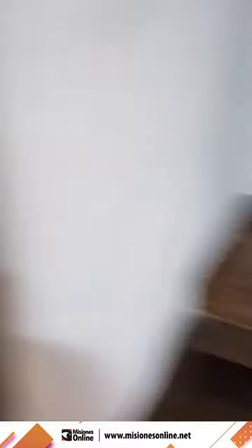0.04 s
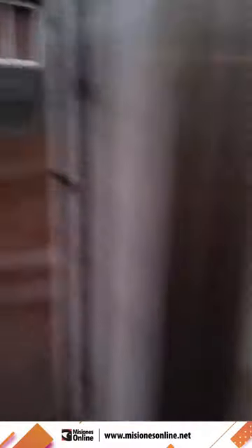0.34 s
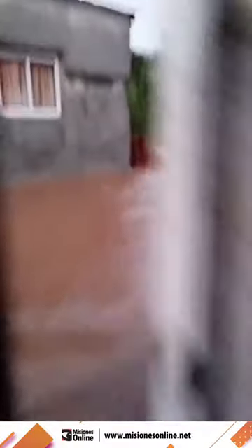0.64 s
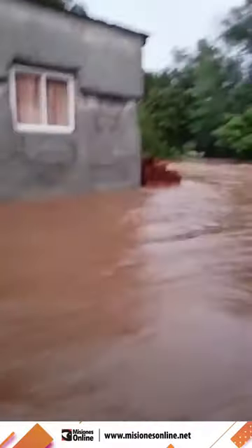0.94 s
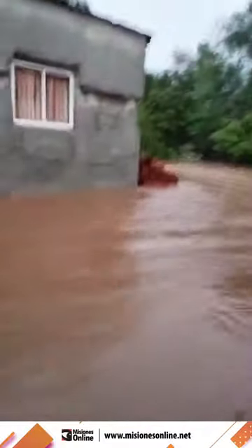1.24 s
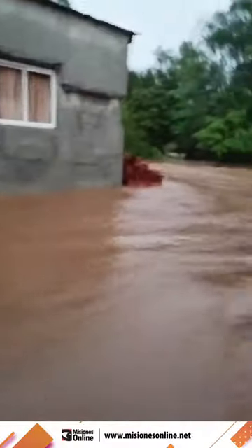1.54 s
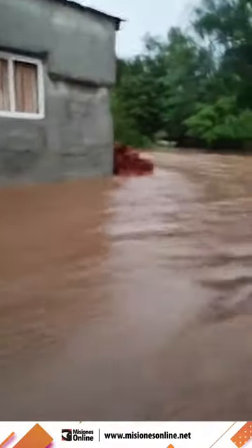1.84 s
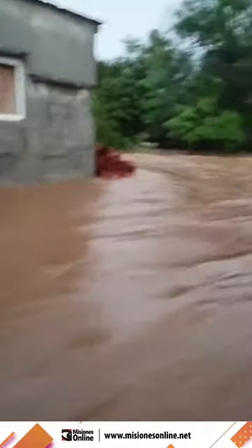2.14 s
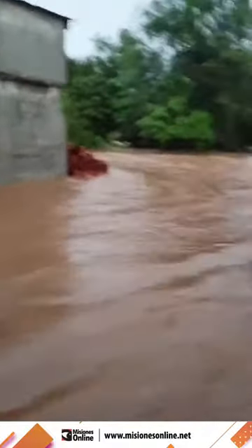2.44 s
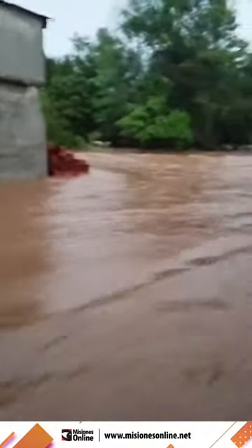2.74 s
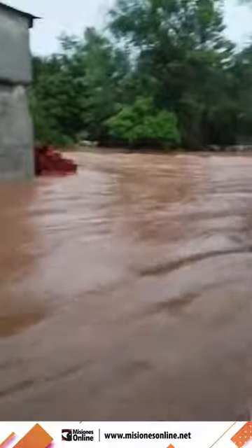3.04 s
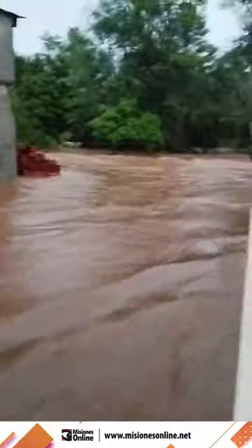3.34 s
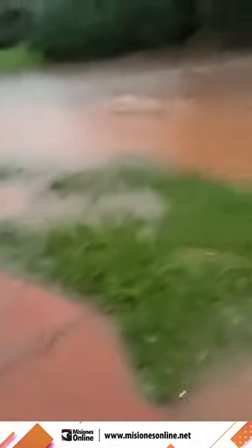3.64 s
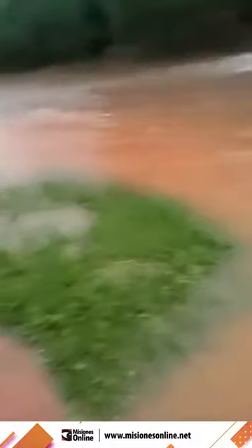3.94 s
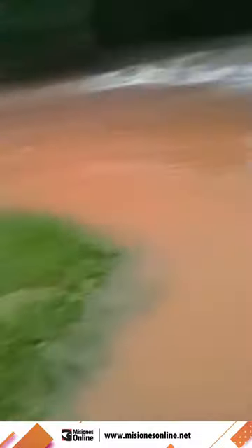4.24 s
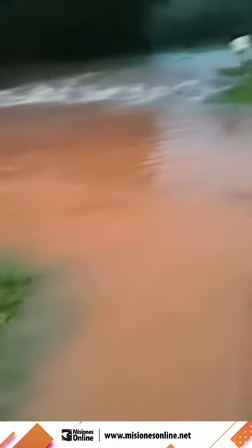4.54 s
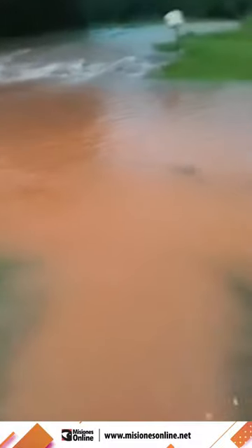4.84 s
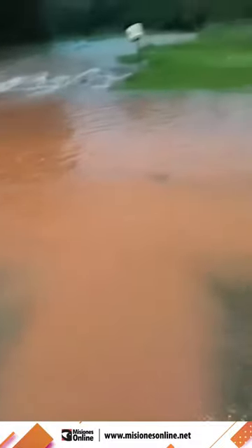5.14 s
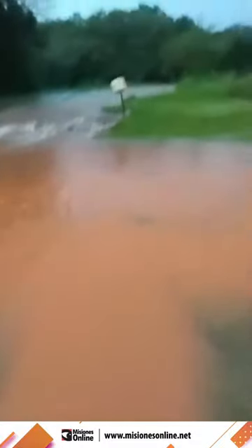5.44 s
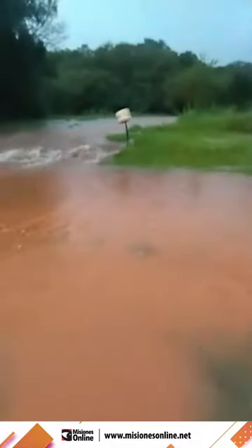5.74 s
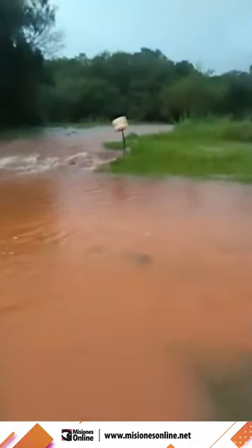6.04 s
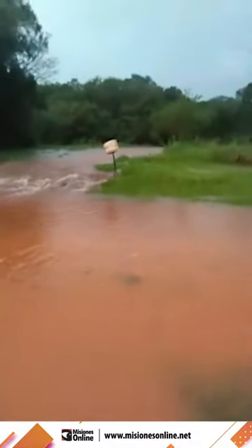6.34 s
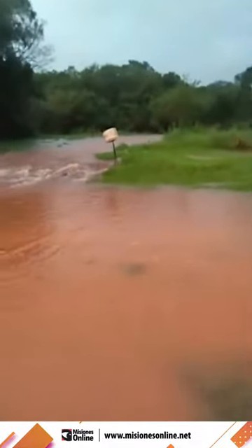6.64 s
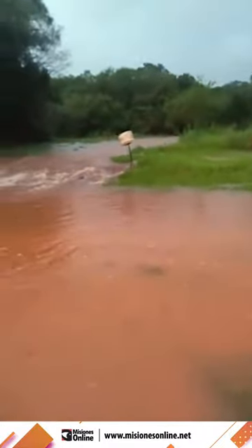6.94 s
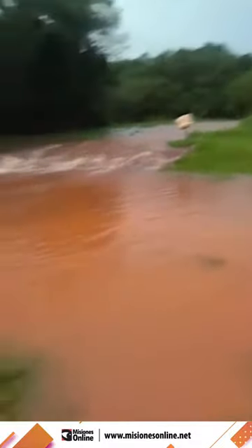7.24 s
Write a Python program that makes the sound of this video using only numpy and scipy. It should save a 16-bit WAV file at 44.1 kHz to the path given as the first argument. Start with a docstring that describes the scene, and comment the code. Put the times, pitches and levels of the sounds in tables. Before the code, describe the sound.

A heavy, steady roar of floodwater starts muffled and opens into a bright hiss, as heard on approaching a window. Light rustling, a soft thump, several sharp ticks and a low motor-like drone accompany it. After a sudden cut, a much softer stream runs over a flooded road, in mono: a brief swell of splashing, then irregular bubbling, low glugs, trickling and close drips.

```python
"""Floodwater roars past a house, brightening as the listener nears a window, with a low drone like a far
motor, soft rustles, a dull bump and sharp ticks. Eddies make the rumble; bursting bubbles make the hiss.
After 3.5 s the scene changes to a ford, in mono: shallow water surges, then babbles and gurgles across
a road while drops patter close by. The babble is five narrow bands that swell and fade; single bubbles
and large air pockets ring among them as damped oscillators."""
import sys
import numpy as np
from scipy import signal
from scipy.fft import rfft, irfft, next_fast_len
from scipy.io import wavfile
from scipy.ndimage import uniform_filter1d

SR = 44100
rng = np.random.default_rng(int(sys.argv[2]) if len(sys.argv) > 2 else 0)


def materialize(psi):
    """Save the field psi as 16-bit PCM at rate SR to the path in sys.argv[1].

    A 1-D psi becomes a single channel; in a 2-D psi each row is a channel.
    """
    bounded = np.clip(np.atleast_2d(psi).T, -1, 1)
    quanta = np.round(bounded * 32767).astype(np.int16)
    wavfile.write(sys.argv[1], SR, quanta)


N = 330309
TIME = np.arange(N) / SR
FFT_SIZE = next_fast_len(N, real=True)
BIN_HZ = np.maximum(np.arange(FFT_SIZE // 2 + 1) * SR / FFT_SIZE, 1)
WINDOW_END_S, FORD_START_S = 3.517, 3.615

# Spectral densities of the torrent's layers: frequency_hz, relative_db
RUMBLE_SPECTRUM = [(12, -54), (30, -44), (44, -11), (62, -4.5), (88, 1), (190, 3), (270, -0.5), (315, -2.5),
                   (345, -9.5), (450, -5), (600, -30)]
ROAR_SPECTRUM = [(330, -17), (450, -11), (540, 5), (610, 5), (700, 3), (800, -3), (900, -3), (1050, -5),
                 (1500, -21)]
RUSH_SPECTRUM = [(600, -48), (850, 5), (1130, -3.5), (1400, 4), (1600, 1.5), (1850, 1.5), (2050, -1.5),
                 (2300, 0.5), (2800, -0.5), (3200, -11), (4200, -41)]
HISS_SPECTRUM = [(2500, -1), (3300, 2), (4000, 4.5), (4700, 5), (5600, 1), (6200, -6.5), (7100, -3.5),
                 (7700, -9.5), (9000, -11.5)]
SPRAY_SPECTRUM = [(6000, 3.5), (7800, 2.5), (8500, 4), (10000, 1.5), (13000, 2), (14200, -0.5),
                  (14800, -16), (16000, -36)]
# Likeness of the torrent at the two ears: frequency_hz, correlation
EAR_CORRELATION = [(25, 0.9), (60, 1), (130, 1), (290, 0.98), (640, 0.57), (1400, 0.15), (3000, 0.025),
                   (15000, 0.089)]
# Approach to the flood, and the lifting of the window frame's shadow: time_s, gain_db
APPROACH = [(0, -5), (.3, -6.5), (.7, -2), (1.4, 0.5), (3.5, 2)]
OPENNESS = [(.4, -11.5), (.78, -3), (1.27, -3), (1.47, 2.5), (1.75, 1), (2.2, 4.5)]
# Reflections from frame and wall: delay_s, gain
FRAME_ECHOES = [(.0009, 0.07), (.0026, 0.1), (.0047, 0.3), (.0083, 0.35)]
# Resonances of the flood, hollow ones and those of open water: centre_hz, width_hz, relative_db
HOLLOW_MODES = [(563.4, 22, -10.5), (698.4, 53, 1), (786.5, 40, -2.5)]
OPEN_WATER_MODES = [(1225, 72, 0.5), (1354, 95, 3.5), (2266, 74, -2.5)]
# Course of the drone: time_s, pitch_hz, fundamental_db, octave_db
DRONE_COURSE = [(0, 59.2, -69, -51), (.6, 60, -42, -41.5), (.8, 59.64, -38, -37), (1.05, 59.7, -42, -32),
                (1.24, 60.04, -51, -45), (1.4, 60.95, -42, -27.5), (1.52, 61, -34.5, -42),
                (1.7, 62.1, -32.5, -32), (3.5, 63.4, -30.5, -31.5)]
# Sharp ticks: peak_s, level_db, centre_hz, width_octaves, decay_s, left_minus_right_db
TICKS = [(1.118, -30, 6440, 1.2, 0.0018, -2), (1.413, -32, 11000, .7, 0.0034, 7),
         (1.425, -25, 5200, 1.3, .002, 0), (1.491, -17.5, 7160, 0.79, 0.0016, -2),
         (1.598, -24, 6000, 0.53, 0.0024, -4), (1.955, -16, 4540, 0.69, .0018, -10),
         (2.084, -17, 7120, 0.23, .004, -2), (2.187, -25, 5500, 1.4, .002, -4),
         (2.442, -35.5, 11200, .9, .002, 0), (2.88, -30.5, 9500, 0.69, .0014, 10),
         (3.039, -22.5, 11000, 0.72, .002, 4), (3.177, -11, 4600, 0.62, .0014, -5)]
# Rustles and puffs: peak_s, level_db, centre_hz, width_octaves, rise_s, decay_s, left_minus_right_db
RUSTLES = [(0.083, -35, 1640, 1.6, 0.39, 0.28, -2), (.08, -40.5, 4940, 0.77, .4, 0.16, -13),
           (.05, -52, 10600, 0.63, .4, 0.2, 16), (.09, -36.5, 6440, 0.27, .015, 0.014, -13),
           (0.317, -29.5, 2100, 0.56, 0.011, 0.047, -6.5), (1.155, -19.5, 110, 2.8, 0.011, 0.02, -6.5),
           (1.521, -37, 2680, .3, 0.018, 0.039, -13.5), (.78, -47, 8600, 1.2, .04, .05, 4),
           (2.239, -30, 890, 0.16, .03, .04, -1)]
# Modes of the bump: pitch_hz, gain_db, t60_s
BUMP_MODES = [(69.6, 10, 0.094), (103, 2, 0.05)]

# Five narrow bands of watery babble, low to high: centre_hz, width_hz, gain_db
BABBLE_BANDS = [(763.4, 180, -3), (993.7, 135, -4.5), (1260, 140, -4.5), (1565, 150, -1), (1872, 340, -2.5)]
# Envelopes of those five bands: time_s, level_db
DEEP_BABBLE = [(3.63, -54), (3.82, -45), (4.03, -49), (4.08, -69), (4.7, -58), (4.92, -48), (5.12, -48),
               (5.24, -42.5), (5.7, -42), (6.7, -38.5), (7.49, -40)]
LOW_BABBLE = [(3.63, -60), (3.69, -47), (3.9, -38), (4.26, -58.5), (4.79, -49.5), (4.9, -44), (5.1, -47),
              (5.3, -46), (5.39, -39), (5.59, -59), (5.65, -47), (6.39, -51), (6.59, -53), (6.65, -40.5),
              (7.4, -36.5), (7.49, -39)]
MIDDLE_BABBLE = [(3.63, -59), (3.7, -47), (4.03, -38.5), (4.19, -54), (4.65, -56.5), (5.02, -40),
                 (5.1, -47.5), (5.27, -41), (5.32, -56), (5.39, -42.5), (5.56, -50), (5.74, -38),
                 (6.39, -44), (6.45, -49), (6.85, -52), (6.95, -70), (7.49, -72)]
HIGH_BABBLE = [(3.63, -60), (3.69, -47), (3.99, -38.5), (4.28, -49.5), (4.35, -58), (4.89, -74),
               (4.91, -58), (5.05, -100), (5.6, -44.5), (6.32, -46.5), (6.35, -40), (6.56, -46),
               (6.64, -39), (7.49, -44.5)]
TOP_BABBLE = [(3.63, -61), (4.0, -39), (4.2, -58), (4.77, -81), (4.82, -43), (4.84, -66), (4.91, -48),
              (5.09, -60), (5.51, -41), (7.33, -42), (7.46, -47), (7.49, -36)]
# Bubbles that stand out: start_s, level_db, pitch_hz, t60_s
SINGLE_BUBBLES = [(4.008, -27, 1640, .07), (4.01, -34, 1140, 0.09), (4.062, -31, 1694, .08),
                  (4.062, -31, 1090, 0.075), (4.09, -34, 1547, 0.16), (4.1, -32, 1094, 0.077),
                  (4.15, -36.5, 1080, .12), (4.22, -34.5, 227, 0.14), (4.228, -37, 1560, 0.16),
                  (4.229, -28.5, 980, 0.041), (4.295, -35, 1526, 0.058), (4.376, -40, 1250, 0.079),
                  (4.81, -34.5, 983, 0.15), (4.86, -33, 873, 0.078), (4.91, -31.5, 765, 0.15),
                  (4.921, -28, 1264, 0.065), (4.98, -29, 770, 0.074), (4.993, -31.5, 1285, 0.13),
                  (5.167, -34, 753, 0.11), (5.185, -28, 222, 0.09), (5.19, -33, 1214, .14),
                  (5.198, -32, 989, 0.16), (5.232, -27, 1190, 0.055), (5.234, -40, 3669, .035),
                  (5.327, -28, 1008, 0.075), (5.327, -35, 3250, .055), (5.361, -30, 260, 0.053),
                  (5.363, -33, 1200, .1), (5.366, -37, 3412, 0.049), (5.395, -30, 1225, .08),
                  (5.409, -36, 3420, 0.045), (5.432, -33.5, 3240, 0.054), (6.666, -29, 773, .07),
                  (6.686, -31, 415, 0.05), (7.0, -37, 343, 0.11), (7.287, -28, 2160, 0.057),
                  (7.306, -28, 980, 0.054), (7.344, -30.5, 292, 0.071)]
# Close drop impacts: impact_s, plop_db, slap_db, fizz_db, spatter_decay_s
DROPS = [(3.857, -39, -33, -36, .004), (3.8855, -27, -34, -28, 0.0045), (3.969, -23.5, -34, -30, 0.0038),
         (4.0023, -24, -28, -23.5, 0.0035), (4.012, -27, -52, -28, 0.003), (4.135, -50, -34, -34, 0.02),
         (4.4062, -50, -59, -35, 0.0092), (4.592, -39, -48, -34, 0.006), (4.615, -58, -53, -39, .003),
         (4.64, -49, -53, -36, .003), (4.762, -36, -56, -44, .004), (4.818, -52, -39.5, -41, 0.01),
         (4.91, -28, -46, -41, 0.0044), (4.915, -30, -42, -36, 0.0026), (4.9226, -31, -43, -49, 0.015),
         (4.9915, -28, -50, -33, 0.012), (5.17, -40, -52, -51, .003), (5.2338, -29.5, -40, -44, 0.0057),
         (5.329, -40, -44, -45, 0.022), (5.369, -39, -38, -43, 0.012), (5.409, -39, -40, -43, 0.0073),
         (5.4336, -42, -42, -39, .011), (5.595, -36, -51, -32, 0.0073), (5.7864, -27, -50, -32, .002),
         (5.802, -25, -32, -19, 0.0079), (5.979, -29, -55, -52, 0.0027), (6.038, -28, -42, -49, 0.014),
         (6.193, -32, -41, -31, 0.006), (6.354, -27.5, -38, -30, 0.0034), (6.382, -29, -30, -28, 0.0086),
         (6.63, -30.5, -38, -34, 0.0044), (6.6895, -31, -32, -28, 0.01), (6.778, -32, -36, -36, 0.0056),
         (6.849, -44, -43, -27, 0.011), (6.897, -36, -49, -35, .005), (7.175, -52, -39.5, -29, 0.013),
         (7.29, -42, -49, -32.5, .004), (7.344, -50, -47, -36, 0.0026)]
# Bands of plop, slap and fizz: low_hz, high_hz
DROP_BANDS = [(750, 1550), (2200, 3600), (4600, 7850)]
# Typical resonances of bubbles trapped by a drop: pitch_hz
DROP_BUBBLES_HZ = [1214, 2350, 3580, 4460, 6730]
# Spectral shaping of the ford's layers: frequency_hz, gain_db
SURGE_SPECTRUM = [(130, -10), (300, 1), (550, -1.5), (750, -8), (1200, -4), (1900, -5.5), (2300, -10.5),
                  (4000, -14), (7000, -8), (10000, -18.5), (15000, -25), (16000, -31)]
GURGLE_SPECTRUM = [(25, -40), (60, -23), (100, -11), (160, -1.5), (220, -0.5), (280, -3.5), (350, -56),
                   (480, -12.5)]
TRICKLE_SPECTRUM = [(1600, -5), (2400, 11), (2750, 8), (3000, 8), (3300, 11), (3700, 7.5), (4200, 9),
                    (4700, 2), (5200, -28)]
PATTER_SPECTRUM = [(3600, -29), (4500, 1.5), (5200, 3), (6200, 6), (6900, 5.5), (7800, 4.5), (8150, -16),
                   (10000, -16)]
WASH_SPECTRUM = [(120, -14), (270, 0), (340, -10), (410, 6.5), (600, 6.5), (900, -0.5), (1300, -3),
                 (2000, 4), (3000, -22)]
MIST_SPECTRUM = [(6500, -36), (8200, 13.5), (9200, 9.5), (10500, 3), (12500, 3), (15000, 4), (16000, -16)]
# Envelopes of the ford's layers: time_s, relative_db
GURGLE_LEVEL = [(3.64, -57), (3.97, -39.5), (4.25, -50), (4.42, -62.5), (4.83, -64), (5.02, -46.5),
                (5.2, -43.5), (5.28, -57), (5.35, -48), (5.65, -42), (6.0, -49.5), (6.4, -45.5), (6.7, -44),
                (6.82, -52), (7.02, -62), (7.38, -47), (7.49, -52)]
TRICKLE_LEVEL = [(3.63, -55), (3.97, -43.5), (4.2, -55.5), (4.7, -59), (5.3, -55), (5.7, -54.5),
                 (5.95, -50.5), (6.25, -56), (6.55, -51.5), (6.79, -46), (7.1, -47), (7.49, -50.5)]
PATTER_LEVEL = [(3.63, -56), (3.94, -38.5), (4.23, -57), (4.6, -58), (4.75, -57.5), (5.4, -54), (5.6, -53),
                (6.2, -46.5), (6.6, -44), (6.78, -39), (6.95, -39), (7.1, -44), (7.49, -50)]
WASH_LEVEL = [(3.63, -61), (4.1, -55), (4.35, -60.5), (4.7, -59.5), (5.3, -59.5), (6.2, -55), (6.7, -51.5),
              (6.95, -55.5), (7.49, -56.5)]


def torrent(turn_s=2.687, turn_db_per_s=13):
    """Turbulence: eddies rumble, waves roar, bubbles hiss. The frame's shadow dims short waves most."""
    near_db, = in_time(APPROACH)
    open_db, = in_time(OPENNESS)
    turn_db = turn_db_per_s * np.maximum(TIME - turn_s, 0)   # the listener turns to the open water
    rumble = white_water(RUMBLE_SPECTRUM, per_s=5000, spread_db=2.75, churn_db=0.56, churn_hz=22)
    roar = white_water(ROAR_SPECTRUM, 4000, 1.3, 0.95, 21) * panned(-0.37)
    hollow = resonances(HOLLOW_MODES)
    rush = frame_reflections(white_water(RUSH_SPECTRUM, 7000, 3.9, 0.99, 22)) * panned(-0.64)
    open_water = resonances(OPEN_WATER_MODES) * panned(-6)
    hiss = frame_reflections(white_water(HISS_SPECTRUM, 14000, 2, 1, 23)) * panned(-5)
    spray = white_water(SPRAY_SPECTRUM, 12000, 1.6, 2.35, 16) * panned(9)
    return (from_db(-30.5 + near_db) * rumble
            + from_db(-34.5 + 1.34 * near_db) * roar
            + from_db(-36.5 + near_db) * hollow
            + from_db(-37.5 + 0.52 * open_db + turn_db) * rush
            + from_db(-46.5 + open_db + 1.2 * turn_db) * open_water
            + from_db(-39.5 + open_db + turn_db) * hiss
            + from_db(-45.5 + 1.12 * open_db + 0.51 * turn_db) * spray)


def white_water(spectrum, per_s, spread_db, churn_db, churn_hz):
    """Superposed bursts merge into noise, coherent between the ears only at long wavelengths."""
    mid, side = rfft([pops(per_s, spread_db), pops(per_s, spread_db)], FFT_SIZE)
    correlation = at_bins(EAR_CORRELATION)
    ears = np.sqrt(1 + correlation) * mid + np.sqrt(1 - correlation) * side * [[1], [-1]]
    water = irfft(ears * from_db(at_bins(spectrum, outside=-90)), FFT_SIZE)[:, :N]
    return rms_one(water * flicker(churn_db, churn_hz))


def resonances(modes):
    """Resonance picks narrow bands out of broadband water noise."""
    return rms_one(sum(from_db(db) * rms_one(band(pops(5000, 1.7), hz - width / 2, hz + width / 2))
                       for hz, width, db in modes))


def frame_reflections(direct):
    """Comb filtering: close echoes interfere with the direct sound, differently at each ear."""
    out = direct.copy()
    for delay_s, gain in FRAME_ECHOES:
        for ear, path_ratio in enumerate((1, 1.13)):
            lag = round(delay_s * path_ratio * SR)
            out[ear, lag:] += gain * direct[ear, :-lag]
    return rms_one(out)


def babble():
    """Amplitude modulation: five narrow bands of watery babble swell and fade, each in its own time."""
    envelopes = DEEP_BABBLE, LOW_BABBLE, MIDDLE_BABBLE, HIGH_BABBLE, TOP_BABBLE
    out = np.zeros(N)
    for (hz, width, db), envelope in zip(BABBLE_BANDS, envelopes):
        low, high = hz - width / 2, hz + width / 2
        noise = rms_one(band(pops(600, 0), low, high, order=4))
        tones = plinks(width / 3, low, high, cycles=91, glide=0.02, spread_db=11)
        lapping = wandering(noise + 1.1 * tones, depth=0.015, rate_hz=3) * flicker(1.1, 14.7)
        out += from_db(db) * gain_curve(envelope) * evened(lapping)
    return out


def single_bubbles(swell_s=0.0024, glide=0.029):
    """Each prominent bubble is a damped oscillator whose pitch rises slightly."""
    out = np.zeros(N + SR)
    age = np.arange(SR // 4) / SR
    for start_s, db, hz, t60 in SINGLE_BUBBLES:
        envelope = from_db(db - 60 * age / t60) * (1 - np.exp(-age / swell_s))
        at = round(start_s * SR)
        out[at:at + len(age)] += envelope * np.sin(2 * np.pi * hz * age * (1 + glide * age / t60))
    return out[:N]


def plinks(per_s, low_hz, high_hz, cycles, glide, spread_db):
    """Damped oscillation: randomly timed tones decay 60 dB over `cycles` as their pitch rises."""
    out = np.zeros(N + SR)
    for when, pitch, strength in rng.random((int(per_s * N / SR), 3)):
        hz = low_hz * (high_hz / low_hz) ** pitch
        t60 = cycles / hz
        age = np.arange(int(t60 * SR)) / SR
        envelope = from_db(spread_db * strength - 60 * age / t60) * (1 - np.exp(-age * hz))
        at = int(when * N)
        out[at:at + len(age)] += envelope * np.sin(2 * np.pi * hz * age * (1 + glide * age / t60))
    return rms_one(out[:N])


def drops(gain_db=-6, spatter_rise_s=0.0037, rebound_s=0.00096, bubble_q=14, top_hz=7900):
    """Impact excitation: a drop's slap, spatter and collapsing crater set trapped bubbles ringing."""
    out, lead = np.zeros(N + SR), SR // 70
    age = (np.arange(SR // 11) - lead) / SR
    for impact_s, *levels_db, decay_s in DROPS:
        hit = 0.077 * rms_one(rng.laplace(size=len(age))) * swell(age, spatter_rise_s, decay_s)
        hit[lead] += 1   # the slap
        hit[lead + round(rebound_s * SR * (0.5 + rng.random()))] -= 0.6   # the crater snaps shut
        pitches = DROP_BUBBLES_HZ * np.exp(0.14 * rng.standard_normal(len(DROP_BUBBLES_HZ)))
        hit += 1.1 * sum(signal.lfilter(*signal.iirpeak(hz, bubble_q, fs=SR), hit) for hz in pitches)
        at = round(impact_s * SR) - lead
        for (low, high), db in zip(DROP_BANDS, levels_db):
            forward = band(hit, low, high, order=1)
            part = band(forward[::-1], low, high, order=1)[::-1]   # zero phase: the bands peak together
            power = uniform_filter1d(part ** 2, size=SR // 400, mode="constant")
            out[at:at + len(age)] += from_db(db + gain_db) * part / np.sqrt(power.max())
    return signal.sosfilt(signal.ellip(6, 0.5, 28, top_hz, fs=SR, output="sos"), out[:N] + 1e-18)


def surge(peak_s=3.875, level_db=-33.5):
    """Dense splashes add incoherently into a sheet of noise that swells and collapses."""
    envelope = from_db(level_db) * swell(TIME - peak_s, rise_s=0.25, decay_s=0.051)
    return envelope * coloured(pops(9000, 3.9), SURGE_SPECTRUM)


def drone(waver=0.0035):
    """Two harmonics, slightly modulated in pitch and amplitude, hum like a far motor."""
    hz, fundamental_db, octave_db = in_time(DRONE_COURSE)
    phase = 2 * np.pi * np.cumsum(hz * (1 + waver * drift(2.4))) / SR
    fundamental = from_db(fundamental_db) * flicker(2.5, 29) * np.sin(phase)
    octave = from_db(octave_db) * flicker(0.2, 3.7) * np.sin(2 * phase)
    return np.sqrt(2) * (fundamental + octave)


def ticks():
    """Each sharp transient has a broadband crack and a short, diffuse reverberation from the room."""
    out = np.zeros((2, N))
    for peak_s, db, hz, octaves, decay_s, lean_db in TICKS:
        tick = puff(peak_s, hz, octaves, 0.001, decay_s) * panned(lean_db)
        room = puff(peak_s, hz, octaves=1.7, rise_s=0.0026, decay_s=0.026)
        crack = puff(peak_s, 6500, octaves=2, rise_s=0.00091, decay_s=0.005)
        out += from_db(db) * (tick + from_db(-17) * crack + from_db(-16) * room)
    return out


def bump(start_s=1.15, level_db=-26):
    """Modal decay: a soft knock leaves two low modes ringing."""
    age = np.maximum(TIME - start_s, 0)
    return sum(from_db(level_db + db - 60 * age / t60) * np.sin(2 * np.pi * hz * age)
               for hz, db, t60 in BUMP_MODES)


def rustles():
    """Swells of band-limited noise are heard as rustles and puffs on the way to the window."""
    return sum(from_db(db) * panned(lean_db) * puff(peak_s, *shape)
               for peak_s, db, *shape, lean_db in RUSTLES)


def gurgle(gain_db=-0.6):
    """Large air pockets resonate low, glugging amid the churning water."""
    glugs = plinks(44.3, 155.4, 303.4, cycles=24.5, glide=0.14, spread_db=12)
    churn = coloured(pops(500, 0.58) * flicker(2.3, 28), GURGLE_SPECTRUM)
    return from_db(gain_db) * gain_curve(GURGLE_LEVEL) * evened(0.57 * churn + 0.61 * glugs)


def trickle(droplets):
    """Fine droplets, shimmering hiss and tiny pings superpose into a trickle."""
    hiss = shimmer(2024, 4580, bands=18, rate_hz=2.9)
    pings = plinks(52, 2425, 4480, cycles=260, glide=0.017, spread_db=10)
    water = 0.37 * droplets + 0.5 * hiss + 0.3 * pings
    return gain_curve(TRICKLE_LEVEL) * coloured(water, TRICKLE_SPECTRUM)


def patter():
    """Common modulation: a crackle of fine impacts and a shimmering fizz swell with one envelope."""
    envelope_db, = in_time(PATTER_LEVEL)
    swell_db = envelope_db - envelope_db[TIME > FORD_START_S].mean()
    crackle = coloured(pops(2200, 3) * flicker(2, 27), PATTER_SPECTRUM)
    fizz = coloured(shimmer(4420, 7853, bands=24, rate_hz=8.3), PATTER_SPECTRUM)
    return from_db(-55 + swell_db) * crackle + from_db(-50.5 + 0.84 * swell_db) * fizz


def shimmer(low_hz, high_hz, bands, rate_hz, flare_db=8):
    """Independent modulation: narrow bands of hiss flare and fade, giving a shimmering trickle."""
    edges, out = np.linspace(low_hz, high_hz, bands + 1), np.zeros(N)
    for low, high in zip(edges, edges[1:]):
        flare = from_db(flare_db * np.clip(drift(rate_hz), -2, 1.5))
        out += flare * band(pops(230, 0), low, high)
    return rms_one(out)


def wash():
    """Overlapping bursts blur into a soft, swaying noise, with low tones ringing through it."""
    bursts = coloured(pops(1500, 5.2) * flicker(1.5, 12), WASH_SPECTRUM)
    rings = plinks(30, 296, 393, cycles=41, glide=0.064, spread_db=17)
    return gain_curve(WASH_LEVEL) * (bursts + 0.8 * rings)


def ambience(droplets):
    """The ford's noise floor: a low murmur and a faint far hiss flecked with droplets."""
    murmur = flicker(1.2, 5.2) * rms_one(band(rng.standard_normal(N), 71, 230))
    mist = coloured(0.59 * rng.standard_normal(N) + 0.31 * droplets, MIST_SPECTRUM)
    return from_db(-70) * murmur + from_db(-64) * mist


def pops(per_s, spread_db):
    """Shot noise: impulses at independent moments, their strengths scattered by spread_db; rms 1."""
    moments = np.flatnonzero(rng.random(N) < per_s / SR)
    sizes = np.minimum(rng.exponential(1, len(moments)), 4)
    out = np.zeros(N)
    out[moments] = from_db(spread_db * sizes) * rng.choice([-1, 1], len(moments))
    return rms_one(out)


def puff(peak_s, hz, octaves, rise_s, decay_s):
    """A transient of band-limited noise, uncorrelated between the ears."""
    out = np.zeros((2, N))
    active = (TIME > peak_s - 6 * rise_s) & (TIME < peak_s + 8 * decay_s)
    age = TIME[active] - peak_s
    edge_ratio = 2 ** (octaves / 2)
    noise = rms_one(band(rng.standard_normal((2, len(age))), hz / edge_ratio, hz * edge_ratio))
    out[:, active] = noise * swell(age, rise_s, decay_s)
    return out


def swell(age, rise_s, decay_s):
    """Exponential growth up to age zero, then exponential decay."""
    return np.exp(np.minimum(age / rise_s, -age / decay_s))


def drift(rate_hz, hop=40, settle=2000):
    """Random fluctuation, low-passed at rate_hz; rms 1."""
    pole = np.exp(-2 * np.pi * rate_hz * hop / SR)
    noise = rng.standard_normal(N // hop + settle + 2)
    slow = signal.lfilter([1], [1, -2 * pole, pole * pole], noise)[settle:]
    return np.interp(np.arange(N) / hop, np.arange(len(slow)), rms_one(slow))


def flicker(depth_db, rate_hz):
    """Gain for random amplitude modulation."""
    return from_db(depth_db * drift(rate_hz))


def wandering(x, depth, rate_hz):
    """Frequency modulation: warping time lets the pitch stray."""
    return np.interp(np.cumsum(1 + depth * drift(rate_hz)), np.arange(N), x, period=N)


def evened(x):
    """Division by the running rms steadies the level but keeps quick flutter."""
    power = np.maximum(uniform_filter1d(x ** 2, size=SR // 6), 0)
    return x / np.sqrt(power + 1e-6)


def coloured(x, spectrum):
    """Filtering by multiplication of spectra; rms 1."""
    gain = from_db(at_bins(spectrum, outside=-90))
    return rms_one(irfft(rfft(x, FFT_SIZE) * gain, FFT_SIZE)[..., :N])


def band(x, low_hz, high_hz, order=2):
    """Butterworth band-pass."""
    edges_hz = [low_hz, min(high_hz, 0.45 * SR)]
    return signal.sosfilt(signal.butter(order, edges_hz, "band", fs=SR, output="sos"), x + 1e-18)


def panned(lean_db):
    """Left and right gains for an interaural level difference."""
    return from_db(np.array([[0.5], [-0.5]]) * lean_db)


def at_bins(points, outside=None):
    """A curve interpolated over log frequency at every FFT bin."""
    hz, value = np.transpose(points)
    return np.interp(np.log(BIN_HZ), np.log(hz), value, outside, outside)


def in_time(rows):
    """Each value column interpolated at every sample."""
    time_s, *columns = np.transpose(rows)
    return [np.interp(TIME, time_s, column) for column in columns]


def gain_curve(rows):
    """A decibel envelope as amplitude at every sample."""
    return from_db(in_time(rows)[0])


def from_db(db):
    """Decibels to amplitude ratio."""
    return 10 ** (np.asarray(db) / 20)


def rms_one(x):
    """Normalisation to unit rms."""
    return x / np.sqrt(np.mean(x ** 2) + 1e-20)


def scene():
    """Sources superpose in two scenes: the window stops abruptly, and after a gap the ford fades in."""
    window = torrent() + drone() + bump() + rustles() + ticks()
    droplets = pops(700, 1.8) * flicker(3, 27)
    ford = babble() + single_bubbles() + drops() + surge()
    ford += gurgle() + trickle(droplets) + patter() + wash() + ambience(droplets)
    fade_out = np.clip((WINDOW_END_S - TIME) / 0.003, 0, 1)
    tail = from_db(-16) * swell(TIME - WINDOW_END_S, 0.013, 0.013)
    fade_in = np.clip((TIME - FORD_START_S) / 0.023, 0, 1)
    return (fade_out + tail) * window + fade_in * ford


def record(dry, cutoff_hz=15900):
    """Band limiting: a steep elliptic low-pass removes the highest treble."""
    return signal.sosfilt(signal.ellip(10, 0.1, 80, cutoff_hz, fs=SR, output="sos"), dry)


dry = scene()
out = record(dry)
materialize(out)
```